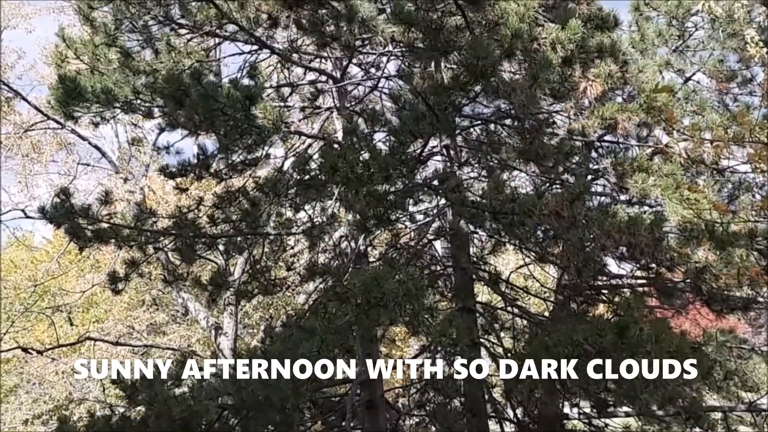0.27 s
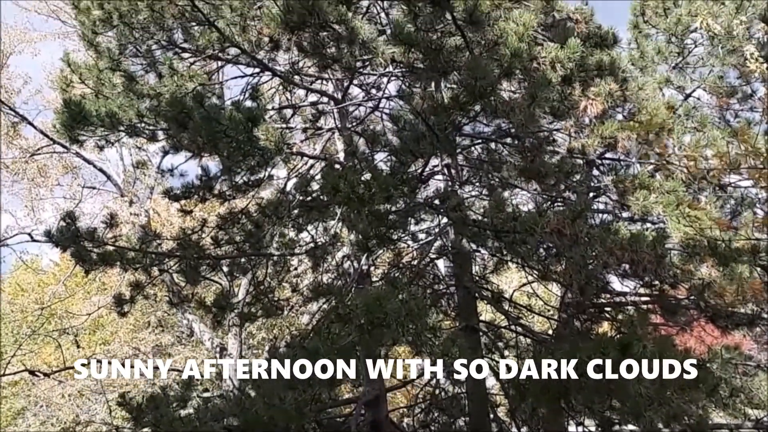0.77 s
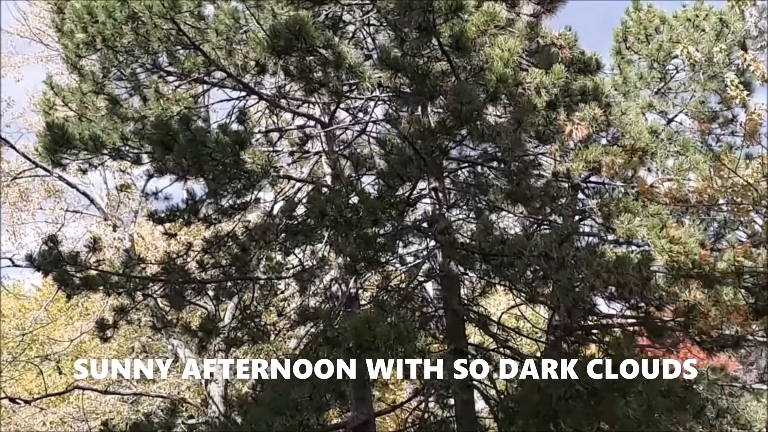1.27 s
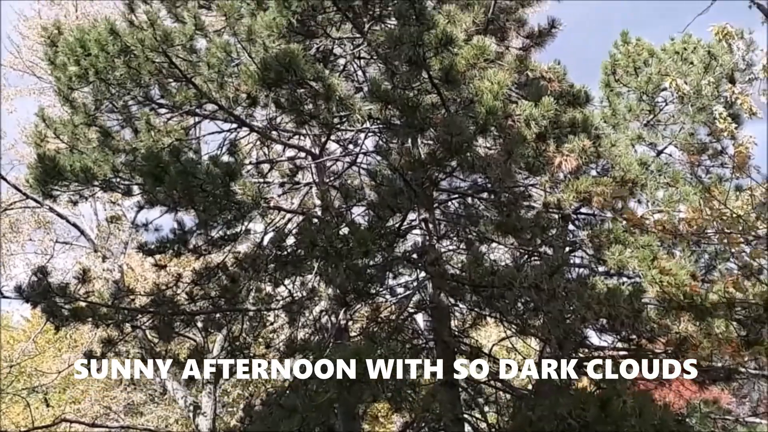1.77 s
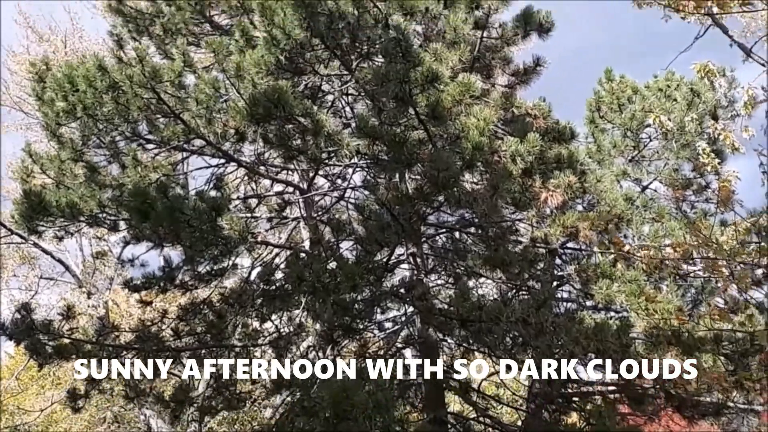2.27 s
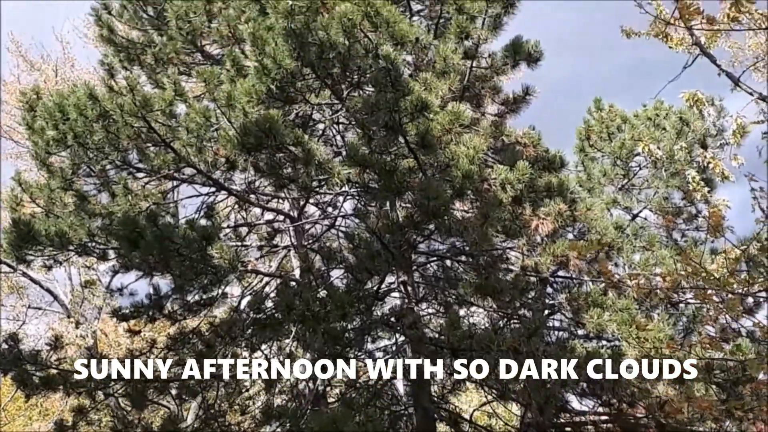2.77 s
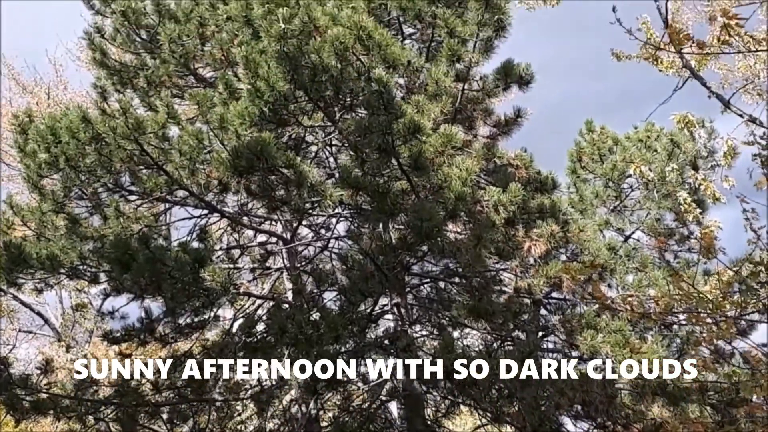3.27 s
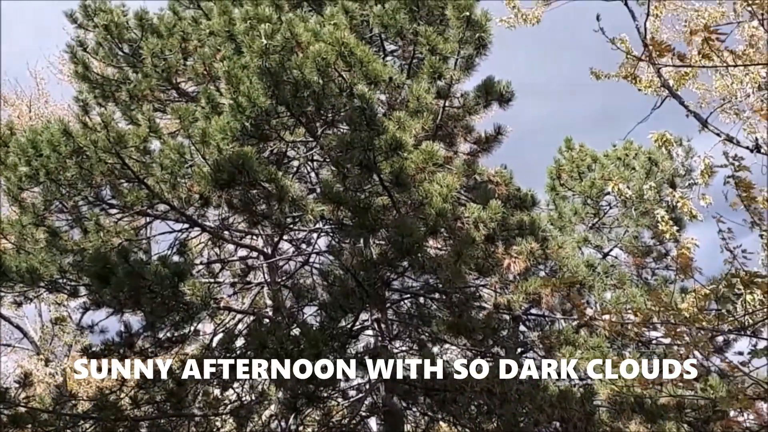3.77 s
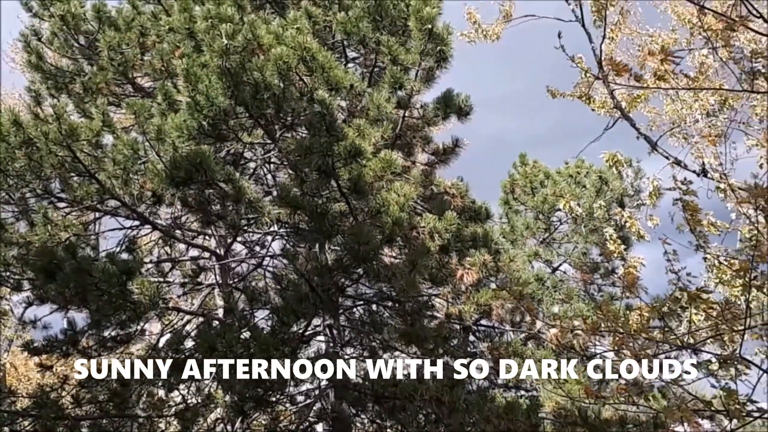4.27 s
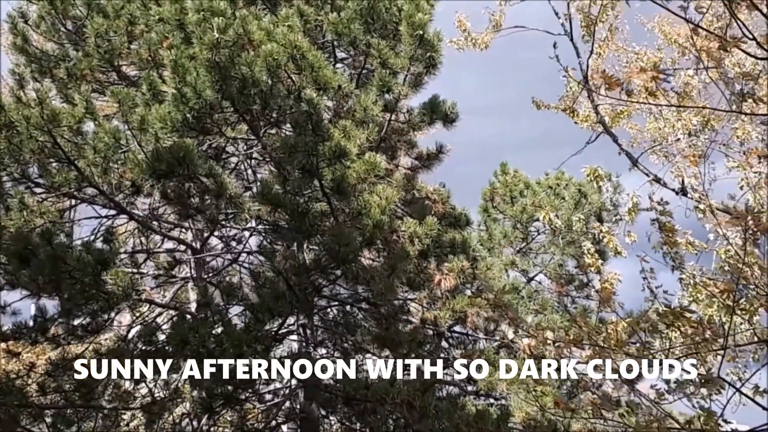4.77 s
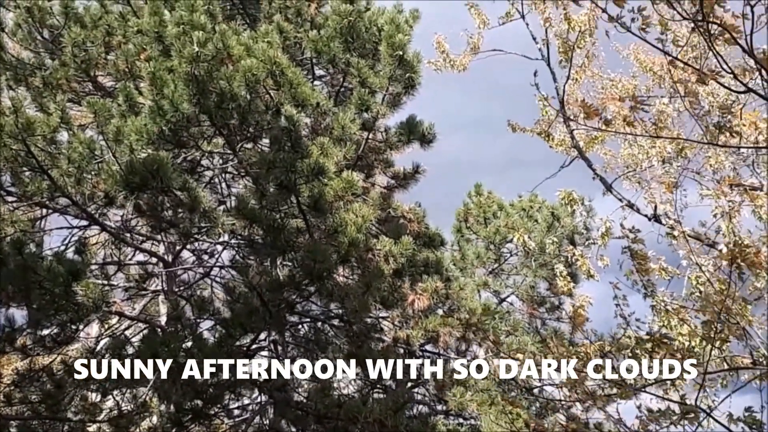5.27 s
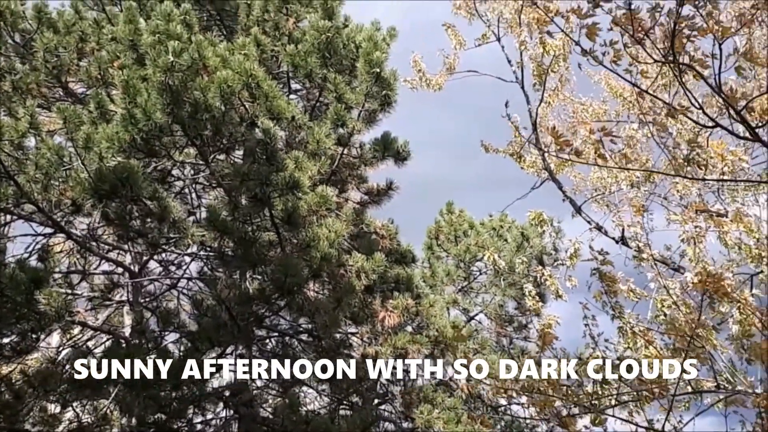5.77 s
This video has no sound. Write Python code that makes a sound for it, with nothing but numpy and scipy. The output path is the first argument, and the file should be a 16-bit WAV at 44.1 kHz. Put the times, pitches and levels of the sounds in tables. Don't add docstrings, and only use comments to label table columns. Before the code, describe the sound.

A quiet, breezy stretch of about six seconds among pines. Wind in the needles makes a continuous soft, airy hiss with a lower sough beneath, freshest at the start and eased by 3 s. Air buffets a small handheld microphone with dull, low thumps and flutters: a cluster at 0.4-0.8 s, more around 1.5-1.7, a strong bump near 1.95, another heavy one near 3.2, then only weak ones, with a slight one at 5.6. A faint, very high insect trill pulses about seventeen times a second throughout. Thin bird seeps step down at 0.1-0.3 s, return at 1.65 and fade at 2.4-2.6. Another bird gives tiny rising chips at 1.4, 3.2, 4.0 and 5.7 s, lightly echoing among trunks. A distant falling whistle of four notes comes at 3.4-3.85 s. Nearly mono.

```python
import sys
import numpy as np
from scipy import signal
from scipy.fft import rfft, irfft, next_fast_len
from scipy.io import wavfile

SR = 44100
rng = np.random.default_rng(int(sys.argv[2]) if len(sys.argv) > 2 else 0)


def put_to_file(sound):
    columns = np.atleast_2d(sound).T
    safe = np.clip(columns, -1, 1)
    whole_steps = np.round(safe * 32767)
    wavfile.write(sys.argv[1], SR, whole_steps.astype(np.int16))


def ratio_of_db(decibels):
    return 10 ** (np.asarray(decibels, float) / 20)


N = 265614


def in_time(rows):
    s, *columns = np.transpose(rows)
    return [np.interp(np.arange(N) / SR, s, column) for column in columns]


def rms_one(x):
    return x / np.sqrt(np.mean(x ** 2) + 1e-20)


def drift(rate_hz):
    r = np.exp(-80 * np.pi * rate_hz / SR)
    white = rng.standard_normal(N // 40 + 2002)
    slow = signal.lfilter([1], [1, -2 * r, r * r], white)[2000:]
    return np.interp(np.arange(N) / 40, np.arange(len(slow)), rms_one(slow - slow.mean()))


def band(low_hz, high_hz, order=2):
    sos = signal.butter(order, [low_hz, high_hz], "band", fs=SR, output="sos")
    return rms_one(signal.sosfilt(sos, rng.standard_normal(N + SR))[SR:])


def resonance(x, hz, width_hz):
    r = np.exp(-np.pi * width_hz / SR)
    gain = (1 - r * r) / 2
    return signal.lfilter([gain, 0, -gain], [1, -2 * r * np.cos(2 * np.pi * hz / SR), r * r], x)


# frequency in Hz, level in dB per Hz.
NEEDLE_COLOUR = [(30, 6.5), (100, 6), (240, -0.5), (500, 1), (1500, -2), (3300, 0.5), (4600, -1),
                 (6300, -1), (7700, -4), (8500, -0.5), (8900, -6), (9400, -13), (11000, -17.5),
                 (15000, -26)]
# time in seconds, level in dB above calm.
CROWN_WIND = [
    (0, 2),
    (.6, 1.5),
    (3.0, 0.16),
    (5.2, 0),
    (6.02, 0),
]
SOUGH_DB, HISS_DB = -60, -54.5
HISS_FOLLOWS = 0.83


def boughs(shared_db=0.12, own_db=0.22, fast_db=0.45):
    size = next_fast_len(N)
    octave = np.log2(np.maximum(np.arange(size // 2 + 1) * SR / size, 1))
    colour_hz, colour_db = np.transpose(NEEDLE_COLOUR)
    colour = ratio_of_db(np.interp(octave, np.log2(colour_hz), colour_db, left=-60))
    spectrum = rfft(rng.standard_normal(size)) * colour
    gust = drift(0.48)
    sough, hiss = np.zeros(N), np.zeros(N)
    for centre in np.arange(5, 14.5, 0.5):
        share = np.clip(1 - 2 * abs(octave - centre), 0, 1)
        sway_db = shared_db * gust + own_db * drift(1.4) + fast_db * drift(10.3)
        part = irfft(spectrum * share, size)[:N] * ratio_of_db(sway_db)
        if centre < 10.4:
            sough += part
        else:
            hiss += part
    wind_db, = in_time(CROWN_WIND)
    return ratio_of_db(SOUGH_DB + wind_db) * rms_one(sough) + ratio_of_db(HISS_DB + HISS_FOLLOWS * wind_db) * rms_one(hiss)


# time in seconds, level in dB.
PORT_GUSTS = [(0.05, -48), (0.89, -42), (1.12, -61), (1.27, -44), (1.99, -48.5), (2.04, -52), (2.46, -48),
              (2.56, -64), (2.79, -38), (3.57, -49.5), (4.24, -47), (4.34, -65), (4.55, -56), (5.06, -52),
              (5.11, -79), (5.19, -50.5), (5.87, -51.5), (5.95, -48)]
# middle in seconds, peak in dB, turning rate in Hz,
# length in seconds.
PORT_EDDIES = [(0.134, -54, 39, 0.047), (0.379, -51, 38, 0.025), (0.432, -36, 52.4, 0.025),
               (0.591, -34.5, 34.6, 0.05), (0.694, -42, 35, 0.026), (0.776, -40, 29.7, 0.081),
               (1.493, -38.5, 39.4, 0.035), (1.559, -42, 39, 0.023), (1.626, -44, 46, 0.015),
               (1.688, -41, 32.8, 0.054), (1.948, -27, 45, 0.018), (1.975, -38, 45, 0.024),
               (2.169, -43, 41, 0.034), (2.231, -37.5, 36.2, 0.059), (2.259, -45, 75, 0.01),
               (2.388, -49, 31, 0.024), (2.719, -56, 32, 0.03), (2.903, -42, 49, 0.013),
               (2.938, -49, 57, 0.014), (3.106, -40, 37, 0.026), (3.128, -39.5, 60, 0.026),
               (3.168, -30.5, 35.5, 0.082), (3.263, -38, 38, 0.015), (3.388, -41, 51, 0.02),
               (3.739, -40, 45, 0.022), (3.954, -48, 51, 0.06), (3.984, -47, 80, 0.015),
               (4.07, -49, 62, 0.034), (5.578, -55, 40, 0.036)]
RUMBLE_DB, RUMBLE_FOLLOWS = -58, 0.27
EDGE_DB, EDGE_DB_PER_DOUBLING = -16.5, -0.5
CREST_SLIP = 0.2


def buffeting():
    gust_db, = in_time(PORT_GUSTS)
    rumble_db = RUMBLE_DB + RUMBLE_FOLLOWS * (gust_db - gust_db.mean())
    heave = ratio_of_db(gust_db) * band(3.6, 21.3, order=3)
    rumble = ratio_of_db(rumble_db + 2.5 * drift(11.0)) * band(18.0, 44.6)
    margin = SR // 5
    t = np.arange(-SR // 5, SR // 5) / SR
    padded = np.pad(heave + rumble, margin)
    for (s, db, hz, length), turn in zip(PORT_EDDIES, rng.random(len(PORT_EDDIES))):
        swell = np.exp(-4 * np.log(2) * (t / (0.87 * length)) ** 2)
        angle = 2 * np.pi * (hz * t + CREST_SLIP * (2 * turn - 1))
        edge = np.cos(2.1 * angle) + 0.25 * np.cos(3.48 * angle)
        edge_db = EDGE_DB + EDGE_DB_PER_DOUBLING * np.log2(50 * length)
        eddy = ratio_of_db(db) * swell * (np.cos(angle) + ratio_of_db(edge_db) * swell * edge)
        at = round(s * SR)
        padded[at:at + len(t)] += eddy[:len(padded) - at]
    return padded[margin:margin + N]


# frequency in Hz, width in Hz, level in dB.
WING_RESONANCES = [
    (8628, 55, -68.5),
    (9090, 100, -76),
    (8400, 500, -72),
]
THROB_HZ, FIRST_THROB_S = 17.14, 0.011


def insect(depth=0.6):
    t = np.arange(N) / SR
    turn = 2 * np.pi * (THROB_HZ * (t - FIRST_THROB_S) + 0.1 * drift(1.7))
    throb = np.exp(depth * np.cos(turn)) * ratio_of_db(1.2 * drift(2.5))
    trill = np.zeros(N)
    for hz, width_hz, db in WING_RESONANCES:
        scrape = resonance(rng.standard_normal(N), hz, width_hz)
        trill += ratio_of_db(db) * rms_one(throb * scrape)
    return trill


LATE_PEAK, EVEN_PEAK = 3.3, 0.78


def sing(notes, bend=1.32, echo_t60=0.48, echo_db=-25.5):
    out = np.zeros(N + SR)
    t = np.arange(SR // 3) / SR
    echo_decay = ratio_of_db(echo_db - 60 * t / echo_t60) * (t > 0.006)
    for s, length, start_hz, end_hz, db, wet, late in notes:
        u = np.arange(round(length * SR)) / (length * SR)
        hz = end_hz + (start_hz - end_hz) * (1 - u) ** bend
        swell = np.sin(np.pi * u ** late) ** 0.24
        note = ratio_of_db(db + 3.5) * swell * np.sin(2 * np.pi * np.cumsum(hz) / SR)
        trunks = rng.standard_normal(len(t)) * echo_decay
        heard = wet * signal.fftconvolve(note, trunks)
        heard[:len(note)] += note
        at = round(s * SR)
        out[at:at + len(heard)] += heard
    return out[:N]


# start in seconds, length in seconds, top in Hz, level in dB,
# share of echo from 0 to 1.
CHIP_NOTES = [
    (1.383, .034, 7430, -50.5, 0.33),
    (3.178, 0.023, 7500, -51.5, .45),
    (4.017, .03, 7400, -53.5, 0.84),
    (5.676, 0.027, 7870, -54.5, 0.6),
]
CHIP_START_HZ = 6650
TAIL_GAP_S, TAIL_S, TAIL_DB = 0.01, 0.022, -65.5
TAIL_FALL = 0.5


def chips():
    notes = []
    for s, length, top_hz, db, wet in CHIP_NOTES:
        notes.append((s, length, CHIP_START_HZ, top_hz, db, wet, LATE_PEAK))
        tail_end_hz = top_hz - TAIL_FALL * (top_hz - CHIP_START_HZ)
        notes.append((s + length + TAIL_GAP_S, TAIL_S, top_hz, tail_end_hz, TAIL_DB, wet, EVEN_PEAK))
    return sing(notes)


# start in seconds, length in seconds, pitch in Hz, level in dB.
SEEP_NOTES = [
    (.094, 0.014, 6840, -52),
    (0.191, .014, 6450, -56),
    (0.276, .015, 6450, -58),
    (1.633, 0.023, 6310, -56),
    (1.685, 0.043, 6330, -58),
    (2.419, 0.027, 6730, -61),
    (2.532, 0.022, 6270, -62),
    (2.57, .07, 6200, -64),
]


def seeps(rise_hz=128, echo=0.64):
    return sing([(s, length, hz - rise_hz, hz, db, echo, LATE_PEAK) for s, length, hz, db in SEEP_NOTES])


# start in seconds, length in seconds, pitch in Hz, level in dB.
WHISTLE_NOTES = [
    (3.357, .07, 4050, -64.5),
    (3.47, 0.06, 3900, -65),
    (3.573, 0.058, 3900, -69),
    (3.798, 0.06, 3380, -64.5),
]


def whistles(sag_hz=92, echo=0.44):
    return sing([(s, length, hz + sag_hz, hz, db, echo, EVEN_PEAK) for s, length, hz, db in WHISTLE_NOTES])


# time in seconds, low edge in Hz,
# high edge in Hz, level in dB.
CHANNEL_PARTINGS = [(2.313, 7640, 8950, -65), (2.496, 6900, 8300, -64), (3.354, 9000, 10500, -74),
                    (3.824, 5300, 6300, -67), (5.33, 5300, 10300, -61), (5.516, 7640, 9700, -62),
                    (5.886, 7600, 10300, -63), (5.887, 4300, 5300, -62)]
RIPPLE_HZ = SR / 1024


def difference():
    t = np.arange(N) / SR
    out = ratio_of_db(-84.5 + 0.6 * drift(8.0)) * band(10500, 15000, order=3) + ratio_of_db(-96.5) * band(180, 2500)
    white = rng.standard_normal(N)
    for s, low_hz, high_hz, db in CHANNEL_PARTINGS:
        near = slice(round((s - 0.02) * SR), round((s + 0.02) * SR))
        sos = signal.butter(4, [low_hz, high_hz], "band", fs=SR, output="sos")
        swell = np.exp(-((t[near] - s) / 0.008) ** 4)
        out[near] += ratio_of_db(db) * swell * rms_one(signal.sosfilt(sos, white[near]))
    ripple = ratio_of_db(-67.5 + 1.5 * drift(6.1)) * np.sin(2 * np.pi * RIPPLE_HZ * t)
    return out + ripple


def scene():
    mid = boughs() + buffeting() + insect() + chips() + seeps() + whistles()
    side = difference()
    return np.array([mid + side, mid - side])


def low_pass(x):
    return signal.sosfilt(signal.butter(12, 15150, fs=SR, output="sos"), x)


CONVERTER_OFFSET = [
    [.02898],
    [.02584],
]
NOTCH_HZ = 5455


def record(dry):
    turn = 2 * np.pi * NOTCH_HZ / SR
    zero = np.exp(-np.pi * 20 / SR)
    pole = np.exp(-np.pi * 1500 / SR)
    top = [1, -2 * zero * np.cos(turn), zero ** 2]
    bottom = [1, -2 * pole * np.cos(turn), pole ** 2]
    notched = signal.lfilter(top, bottom, dry)
    return low_pass(0.9 * notched + np.array(CONVERTER_OFFSET))


dry = scene()
out = record(dry)
put_to_file(out)
```